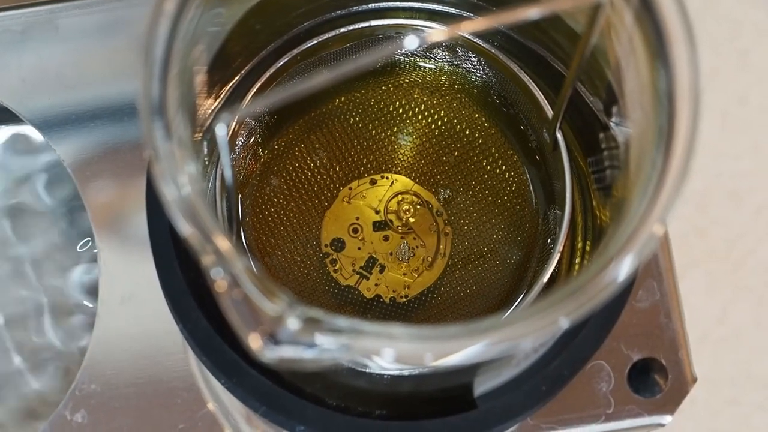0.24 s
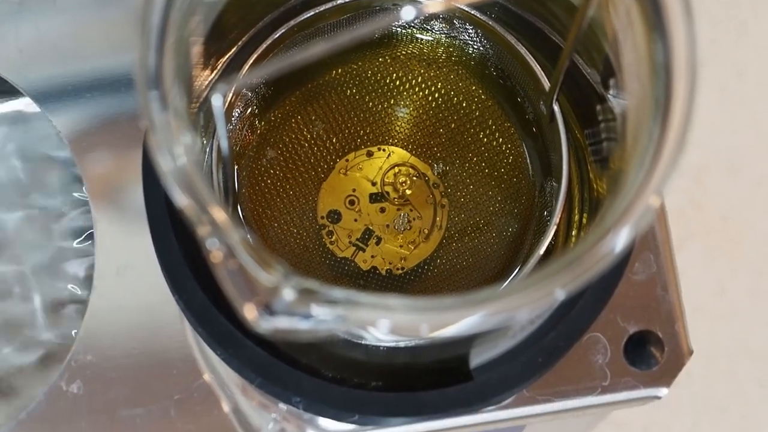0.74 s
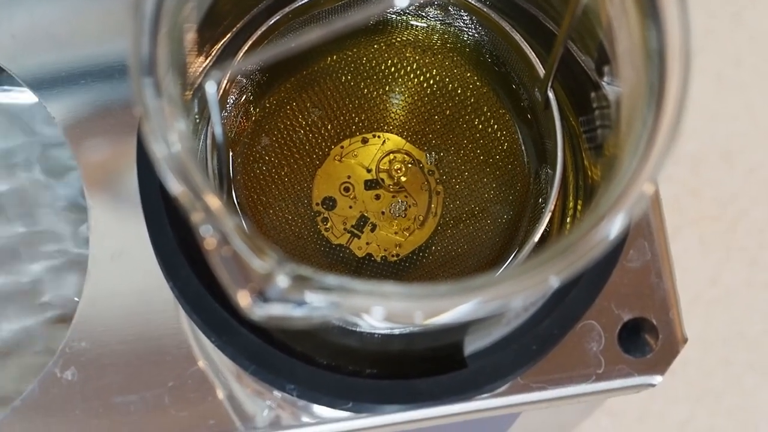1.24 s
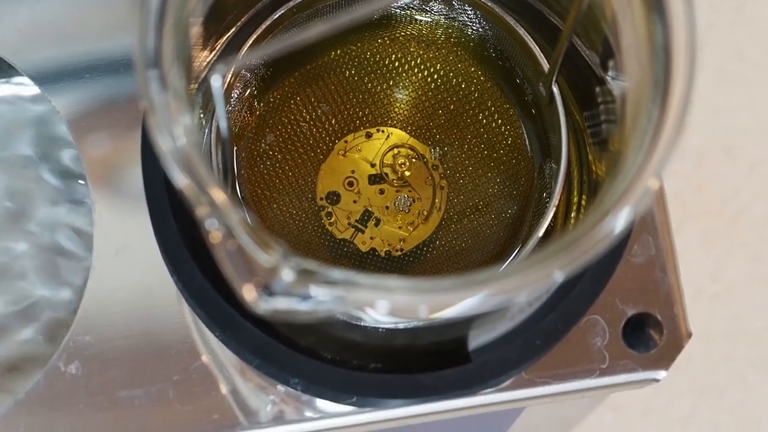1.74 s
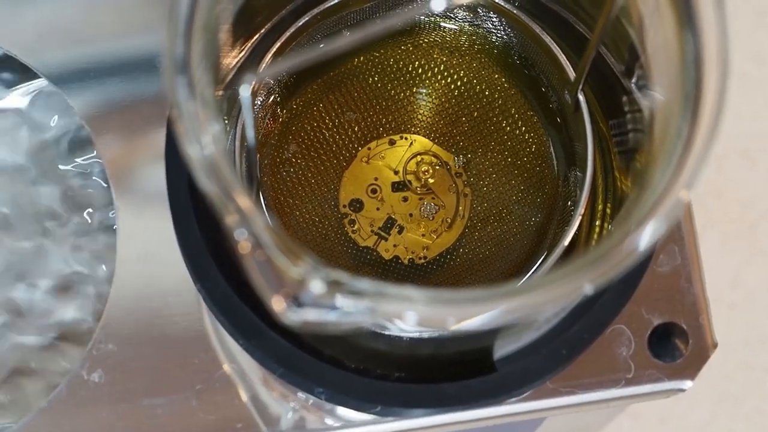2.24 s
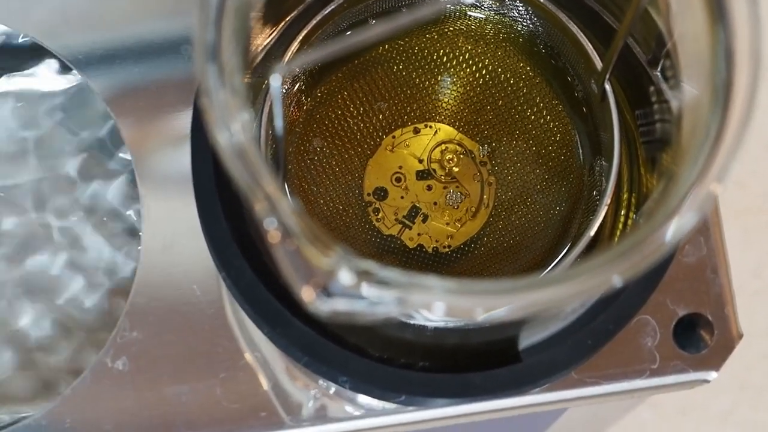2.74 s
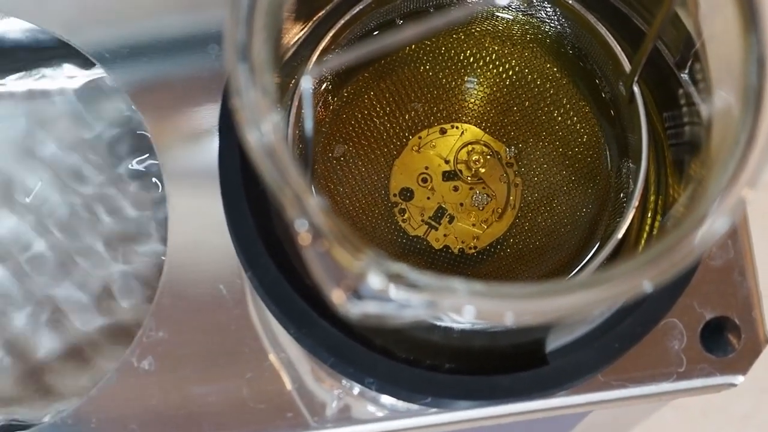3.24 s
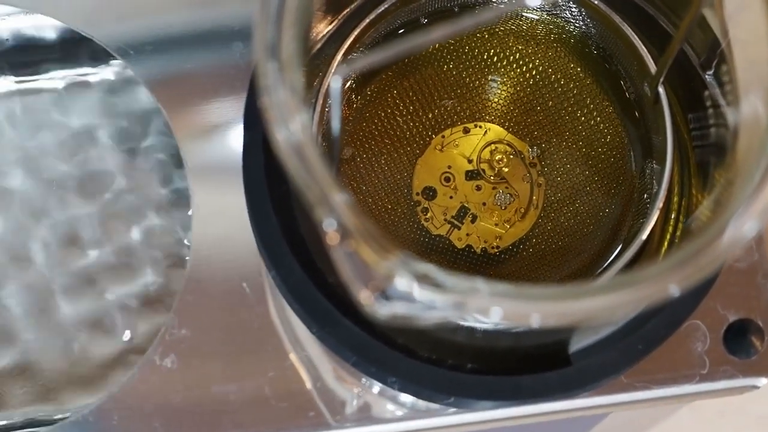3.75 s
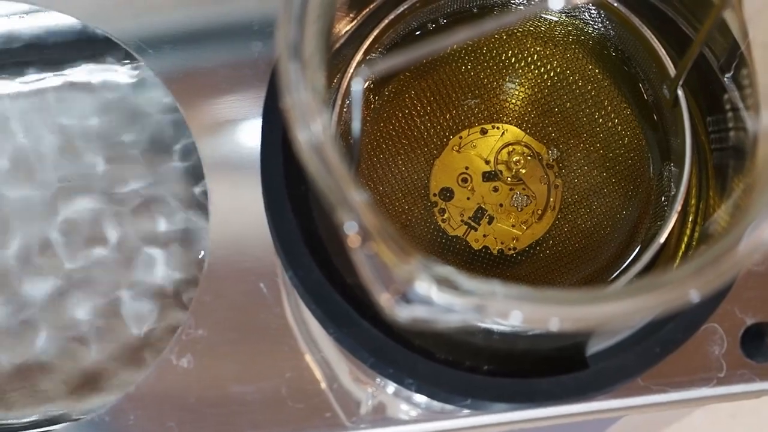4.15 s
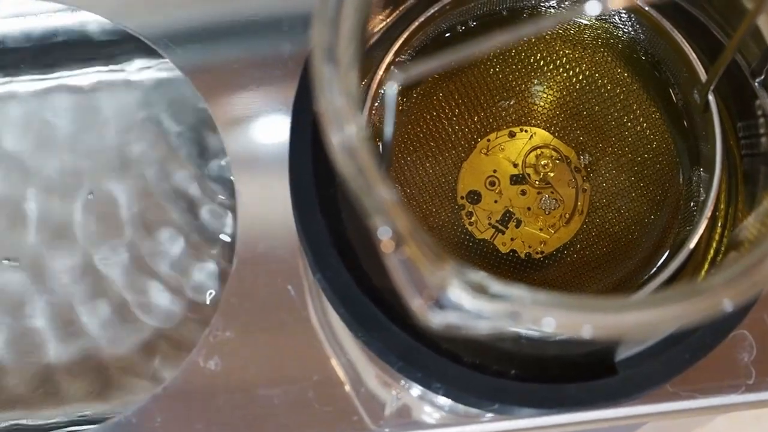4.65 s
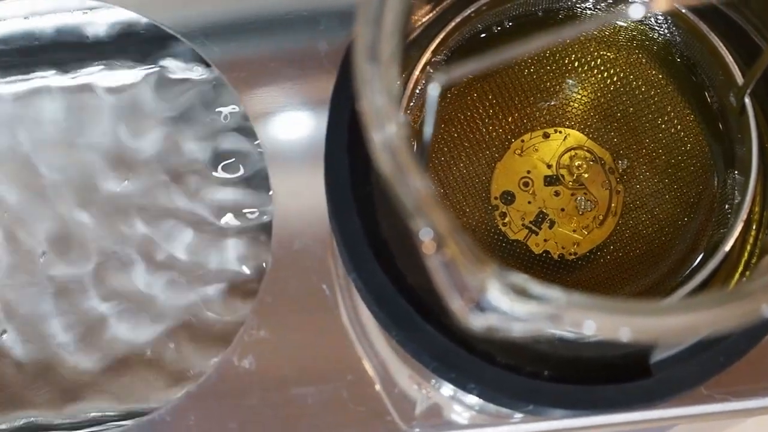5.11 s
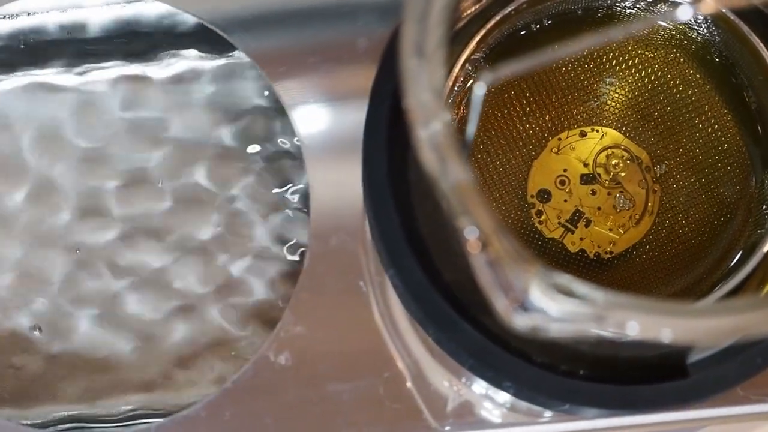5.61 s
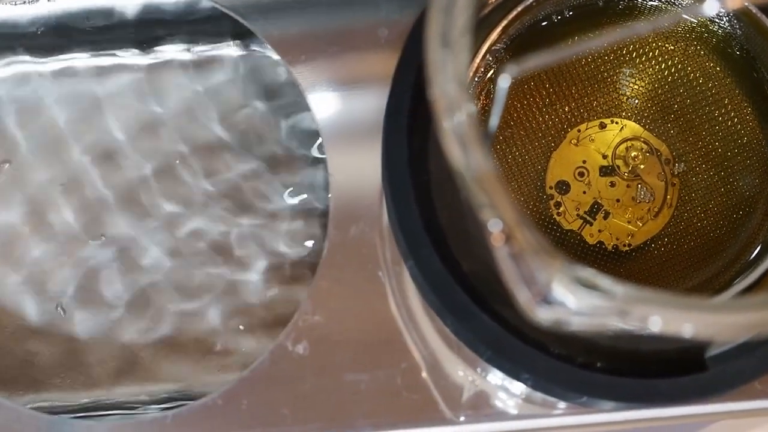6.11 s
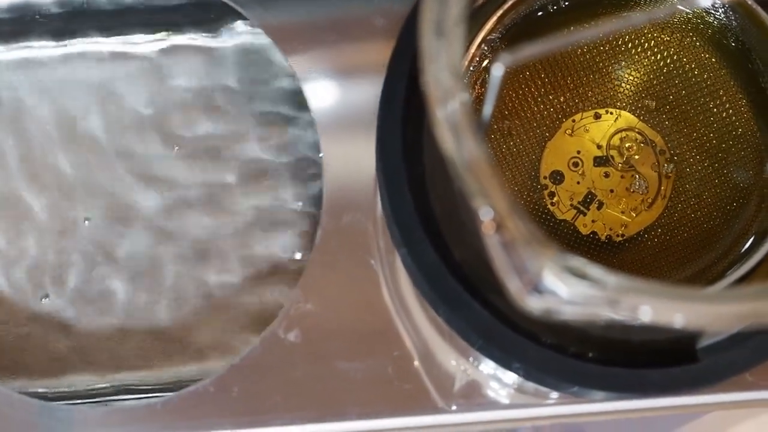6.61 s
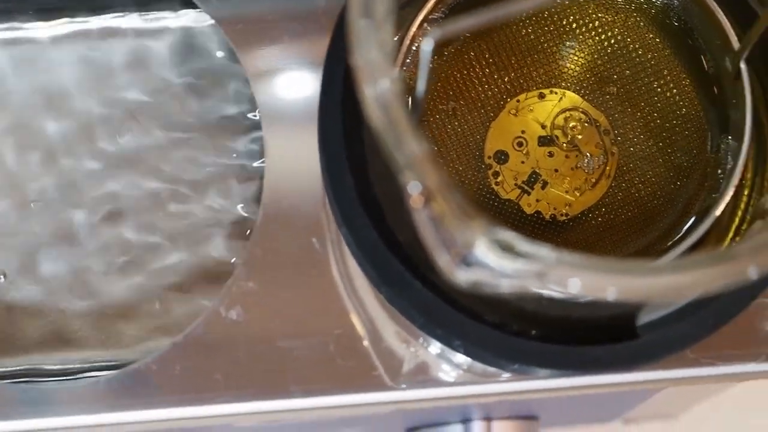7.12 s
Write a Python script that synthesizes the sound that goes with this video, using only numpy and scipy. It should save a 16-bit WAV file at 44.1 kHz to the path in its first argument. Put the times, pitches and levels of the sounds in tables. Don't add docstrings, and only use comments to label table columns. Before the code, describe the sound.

Close up, an ultrasonic cleaner fizzes and buzzes steadily, its thin high treble ringing in glass and steel above a low electrical hum.

```python
import sys
import numpy as np
from scipy import signal
from scipy.fft import rfft, irfft, next_fast_len
from scipy.io import wavfile
from scipy.ndimage import uniform_filter1d, map_coordinates

SR = 44100
rng = np.random.default_rng(int(sys.argv[2]) if len(sys.argv) > 2 else 0)


def waveform_to_disk(signal):
    frames = np.transpose(np.atleast_2d(signal))
    scaled = np.clip(frames, -1, 1) * 32767
    samples = np.round(scaled).astype(np.int16)
    wavfile.write(sys.argv[1], SR, samples)


def nominal_scale(level):
    x = np.asarray(level, float) / 20
    return 10 ** x


N = 325017

MAINS_HZ = 50.09
CREST = 0.888
ONSET = 0.29
JITTER = 0.02
HISS_DB, CASE_DB = -49.5, -60
RIM_DB, LIP_DB, WALL_DB, BASE_DB = -6.5, -2, 4, 10
DUCK_S, RECOVER_S = 0.027, 0.42
TOP_HZ = 15825

# (time [s], extra level [dB])
SURGES = [(.138, 0.5), (.797, 0.5), (1.016, 2.5), (1.057, 1), (1.135, 0.5), (1.158, -1), (1.534, 0.5),
          (2.454, -1), (2.533, 2.5), (2.593, 2), (2.873, 2.5), (3.332, 0), (3.373, 0), (3.452, 3),
          (3.81, 1), (4.13, 1.5), (5.468, 4.5), (5.587, -1), (5.609, -0.5), (6.086, 3), (6.226, 1),
          (6.486, 1), (7.085, 0), (7.325, -0.5)]
# (frequency [Hz], level per Hz [dB])
HISS_SPECTRUM = [(500, -58), (800, -37.5), (1050, -31.5), (1250, -14), (1550, -19), (1950, -17),
                 (2400, -8.5), (3900, -4.5), (4650, -5), (7200, 0.5), (8460, -3.5), (11300, 1), (13000, 6),
                 (15700, -0.5)]
# (frequency [Hz], half-width [Hz], level [dB])
TANK_NULLS = [(4250, 110, -4.5), (4750, 170, -4.5), (5600, 200, -2), (5000, 120, 1.5), (11700, 150, 2)]
# (frequency [Hz], width [Hz], level [dB])
BEAKER_MODES = [(9550, 600, 0), (10450, 300, 0)]
# (frequency [Hz], width [Hz], level [dB])
WALL_MODES = [(14000, 480, 0), (13400, 400, -8)]
# (frequency [Hz], width [Hz], level [dB])
BASE_MODES = [(15080, 500, 0), (15500, 350, -4)]
# (frequency [Hz], width [Hz], level [dB])
LID_MODES = [(1110, 29, -14.5), (1230, 33, 2.5), (1389, 27, -1), (2143, 9.5, 4.5), (2330, 13, 1)]
# (time [s], half-length [s], level [dB])
CLOUD_SWELLS = [
    (1.55, .13, 1),
    (2.8, 0.074, 1),
    (3.35, 0.64, -1),
    (4.4, 0.15, 1),
    (4.92, .08, -0.5),
    (6.55, 0.39, 0.5),
    (7.25, 0.081, 0.5),
]
# (time [s], half-length [s], level [dB])
RIM_LOCKS = [
    (1.635, 0.038, 14),
    (1.954, .1, -17),
    (2.7, 0.17, 7.5),
    (4.112, 0.42, 9),
    (5.0, 0.3, 1),
    (6.28, 0.17, 8.5),
    (6.49, .04, 8.5),
]
# (time [s], half-length [s], level [dB])
LIP_LOCKS = [
    (1.62, .04, 7),
    (2.9, .1, 6),
    (4.25, .05, 5),
    (5.2, 0.13, -5),
    (5.5, 0.05, 7),
    (5.9, 0.32, 5.5),
    (6.18, .045, 3),
    (6.45, .15, 2),
]
# (time [s], half-length [s], level [dB])
WALL_LOCKS = [
    (.3, .1, 3.9),
    (1.5, .3, 4.7),
    (2.45, .12, 3.7),
    (2.6, 0.038, 7.9),
    (3.94, .05, 8),
    (5.6, .05, 4),
    (7.1, .2, 3.7),
    (7.33, 0.037, 8.5),
]
# (time [s], half-length [s], level [dB])
BASE_LOCKS = [(.05, .1, 0), (1.17, 0.16, 5), (1.55, .05, 4), (2.25, .05, 1), (2.54, 0.041, 6),
              (3.33, 0.1, 1), (3.94, .04, 5), (4.25, .1, 1.5), (4.75, 0.27, -1.5), (5.47, .03, 3),
              (5.62, .04, 5), (6.13, 0.055, 6), (6.75, 0.21, -1), (7.2, .1, 3)]
# (frequency [Hz], correlation [0-1])
LIKENESS = [(800, 0.26), (1400, 0.77), (3000, 0.61), (6000, 0.58), (9000, 0.4), (12000, 0.38),
            (15000, 0.35)]
# (frequency [Hz], level [dB])
SHOP_SPECTRUM = [(800, 3), (2500, 2), (6000, -7), (10000, -3.5), (13000, -11.5), (15500, -6.5)]
# (mains multiple [1], level [dB])
HUM = [(1, -14), (2, -7), (3, -49), (4, -3.5), (5, 2.5), (6, -3), (7, -5), (8, -9), (9, -15), (10, -26.5),
       (11, -11), (12, -12), (13, -9), (14, -61), (15, -18.5)]
PANELS_HZ = (225, 425)
# (frequency [Hz], level [dB])
WHINE = [(1132, -79), (1152, -81)]
# (frequency [Hz], level per Hz [dB])
AIR_SPECTRUM = [(12, 0), (20, -9.5), (107, -7), (152, -8.5), (252, -5.5), (409, -6.5), (492, -14),
                (553, -7.5), (633, -10), (841, -21.5), (962, -13.5), (1050, -20.5), (1100, -14.5),
                (1430, -48), (2420, -120)]
# (frequency [Hz], width [Hz], level [dB])
FAN_MODES = [(45, 11.3, 2), (108.5, 9.2, 1)]
# (time [s], half-length [s], level [dB])
DRAUGHT = [
    (.9, 0.82, 7),
    (2.0, .4, 2.5),
    (4.3, .4, -1),
    (5.5, .4, -1),
    (6.95, .3, 2),
]
# (time [s], level [dB], frequency [Hz], width [Hz], rise [s], t60 [s])
TICKS = [
    (0.193, -45, 700, 1410, 0.0011, 0.03),
    (0.201, -40, 2200, 450, 0.00069, 0.027),
    (.258, -51, 1230, 50, 0.0033, .1),
    (2.516, -46.5, 1010, 300, .002, 0.056),
]
# (time [s], level [dB], frequency [Hz], width [Hz], rise [s], t60 [s])
BUMP = [
    (6.95, -49, 320, 260, .04, .4),
    (6.995, -52, 260, 220, .003, .15),
]
# (time [s], depth [dB])
DUCKS = [
    (1.38, 2),
    (1.66, 4.5),
    (2.9, 1),
    (3.7, 2.5),
    (4.31, 3.5),
    (4.47, 3.5),
    (5.72, 1.5),
]
# (frequency [Hz], left minus right [dB])
LEAN = [(60, 0.7), (400, 1.5), (1300, -2.5), (3000, 0.6), (8000, 0.1), (11000, -0.2), (13000, -3.3),
        (15000, -6.5)]
# (frequency [Hz], left lag [rad])
LAG = [(300, .1), (4000, .2), (8700, .5), (10000, 1.9), (13000, 1.9), (14000, 2.7), (15000, 1.2)]


def unit(x):
    return x / np.sqrt(np.mean(x ** 2) + 1e-20)


def along(points, hz):
    f, v = np.transpose(points)
    return np.interp(np.log(hz + 1), np.log(f + 1), v)


def wobble(rate):
    knots = rng.standard_normal(int(N * rate / SR) + 4)
    return map_coordinates(knots, [np.arange(N) * rate / SR], order=2)


def swells(rows, drift_db, rate):
    t = np.arange(0, N + 99, 99) / SR
    bells = sum(db * np.exp(-((t - s) / half) ** 2) for s, half, db in rows)
    return np.interp(np.arange(N) / SR, t, bells) + drift_db * wobble(rate)


def filtered(x, response):
    m = next_fast_len(N + SR // 2)
    return irfft(rfft(x, m) * response(np.fft.rfftfreq(m, 1 / SR)), m)[..., :N]


def ringing(x, modes):
    def response(f):
        return sum(nominal_scale(db) * 1j * f * w / (c * c - f * f + 1j * f * w) for c, w, db in modes)
    return unit(filtered(x, response))


def stereo_noise(alike):
    def mid_side(hz):
        turn = np.arccos(np.clip(along(alike, hz), -1, 1)) / 2
        return np.array([np.cos(turn), np.sin(turn)])
    mid, side = filtered(rng.standard_normal((2, N)), mid_side)
    return np.array([mid + side, mid - side])


def supply(sharp, rest_db, scatter_db, clump_db):
    cycle = MAINS_HZ * np.arange(N) / SR - CREST
    burst_db = scatter_db * rng.standard_normal(N // 800 + 3)
    when, extra_db = np.transpose(SURGES)
    burst_db[np.round(MAINS_HZ * when - CREST).astype(int) + 1] = extra_db
    voltage = np.cos(2 * np.pi * (cycle + JITTER * wobble(40)))
    crest = np.clip(voltage - ONSET, 0, 1) ** sharp
    crest = crest * nominal_scale(burst_db)[np.round(cycle).astype(int) + 1]
    crest = crest + nominal_scale(-27.5) * np.clip(-np.cos(2 * np.pi * cycle), 0, 1) ** sharp
    linger = np.exp(-1 / (0.002 * SR))
    crest = signal.lfilter([1 - linger], [1, -linger], crest)
    remnant = nominal_scale(rest_db + 1.0 * wobble(60))
    return unit((crest + remnant) * nominal_scale(clump_db * wobble(1500)))


def shop(strength, t60):
    fade = nominal_scale(-120 / (t60 * SR))
    power = signal.lfilter([1 - fade], [1, -fade], strength ** 2, zi=[1])[0]
    return filtered(np.sqrt(power) * rng.standard_normal((2, N)), lambda hz: nominal_scale(along(SHOP_SPECTRUM, hz)))


def shimmer(x, patchy_db):
    z = signal.stft(x, nperseg=128)[2]
    field = rng.standard_normal((1, *z.shape[1:]))
    field = uniform_filter1d(field, size=2, axis=1)
    field = uniform_filter1d(field, size=120, axis=2)
    field = uniform_filter1d(field, size=60, axis=2)
    return signal.istft(z * nominal_scale(patchy_db * unit(field)), nperseg=128)[1][:, :N]


def bath():
    strength = supply(sharp=1.27, rest_db=-17.0, scatter_db=0.5, clump_db=2.0)
    cloud = strength * stereo_noise(LIKENESS) + shop(strength, t60=0.31)
    cloud = shimmer(cloud, patchy_db=0.78)

    def tank(hz):
        nulls = sum(db * np.exp(-((hz - c) / w) ** 2) for c, w, db in TANK_NULLS)
        return nominal_scale(along(HISS_SPECTRUM, hz) + nulls)
    hiss = nominal_scale(11) * unit(filtered(cloud, tank))

    deep = (strength + 0.15) * stereo_noise(LIKENESS)
    parts = [(cloud, BEAKER_MODES[:1], RIM_DB, RIM_LOCKS), (deep, BEAKER_MODES[1:], LIP_DB, LIP_LOCKS),
             (cloud, WALL_MODES, WALL_DB, WALL_LOCKS), (deep, BASE_MODES, BASE_DB, BASE_LOCKS)]
    rings = sum(nominal_scale(db + swells(locks, drift_db=0.7, rate=12)) * ringing(x, modes)
                for x, modes, db, locks in parts)
    shaken = (strength + 4.4) * stereo_noise([(1200, 1.0)])
    lid = nominal_scale(-16.5) * ringing(shaken, LID_MODES)
    level = nominal_scale(HISS_DB + swells(CLOUD_SWELLS, drift_db=0.24, rate=9))
    return level * (hiss + rings + lid)


def case():
    t = np.arange(N) / SR

    def phase(k):
        panels_passed = np.sum(k * MAINS_HZ > np.array(PANELS_HZ))
        return 3.5 - 0.25 * k + np.pi * (1 + panels_passed)
    hum = sum(nominal_scale(db + 1.2 * wobble(6)) * np.cos(2 * np.pi * k * MAINS_HZ * t + phase(k))
              for k, db in HUM[1:])
    whine = sum(nominal_scale(db + 64.0 + 4.2 * wobble(5.1)) * np.sin(2 * np.pi * hz * t) for hz, db in WHINE)
    pair = stereo_noise([(60, 0.76), (900, 0.17)])
    air = nominal_scale(-3.0) * unit(filtered(pair, lambda hz: nominal_scale(along(AIR_SPECTRUM, hz))))
    fan = nominal_scale(-10.0 + swells(DRAUGHT, drift_db=0.6, rate=2.7)) * ringing(pair, FAN_MODES)
    return nominal_scale(CASE_DB + 0.6 * wobble(4.5)) * (nominal_scale(-2.5) * unit(hum) + whine + air + fan)


def ticks():
    out, t = np.zeros(N + SR), np.arange(SR // 3) / SR
    for s, db, hz, width, rise, t60 in TICKS + BUMP:
        puff = rng.standard_normal(len(t)) * nominal_scale(-60 * t / t60) * (1 - np.exp(-t / rise))
        body = signal.lfilter(*signal.iirpeak(hz, hz / width, SR), puff)
        out[round(s * SR):][:len(t)] += nominal_scale(db) * body / np.abs(body).max()
    return out[:N]


def scene():
    return bath() + case() + ticks()


def gain_control():
    duck_db = np.zeros(N)
    for s, db in DUCKS:
        late = np.clip(np.arange(N) / SR - s, 0, None)
        duck_db += db * (1 - np.exp(-late / DUCK_S)) * np.exp(-late / RECOVER_S)
    return nominal_scale(-duck_db)


def microphones(x):
    side = np.array([[0.5], [-0.5]])

    def ports(hz):
        return nominal_scale(along(LEAN, hz) * side) * np.exp(-1j * along(LAG, hz) * side) * (hz < TOP_HZ)
    return filtered(x, ports)


def band_dropouts(x, margin_db, valley):
    hz, t, z = signal.stft(x, SR, window="cosine", nperseg=2048)
    rows = z.shape[1] // 6 * 6
    power = np.mean(np.abs(z[:, :rows].reshape(2, -1, 6, len(t))) ** 2, axis=(0, 2))
    band_db = 10 * np.log10(power + 1e-20)
    band_db = band_db - np.mean(band_db[3:55], axis=0)
    usual_db = uniform_filter1d(band_db, size=40, axis=1)
    around_db = uniform_filter1d(usual_db, size=11, axis=0)
    threshold_db = usual_db - margin_db + valley * (around_db - usual_db)
    dropped = np.repeat(band_db < threshold_db, 6, 0)
    dropped &= ((hz[:rows] > 420) & (hz[:rows] < 6800))[:, None]
    keep = np.where(dropped, nominal_scale(-22), 1)
    keep = np.pad(keep, ((0, z.shape[1] - rows), (0, 0)), constant_values=1)
    return signal.istft(z * keep, SR, window="cosine", nperseg=2048)[1][:, :N]


def roll_off(x):
    return signal.sosfilt(signal.butter(12, 17080, fs=SR, output="sos"), x)


def record(dry):
    heard = microphones(dry * gain_control())
    mix = band_dropouts(heard, margin_db=2.75, valley=0.27)
    return roll_off(mix)


dry = scene()
out = record(dry)
waveform_to_disk(out)
```